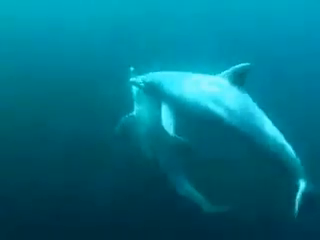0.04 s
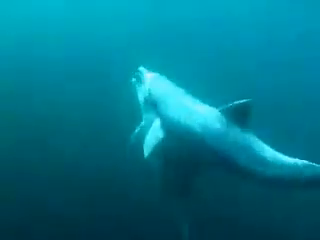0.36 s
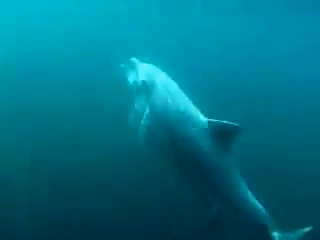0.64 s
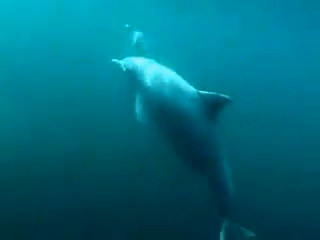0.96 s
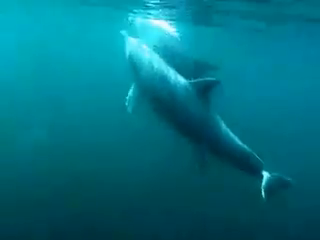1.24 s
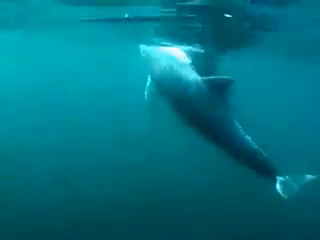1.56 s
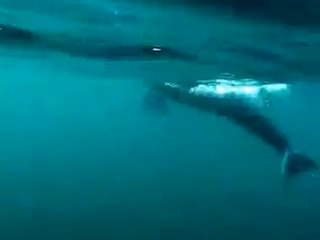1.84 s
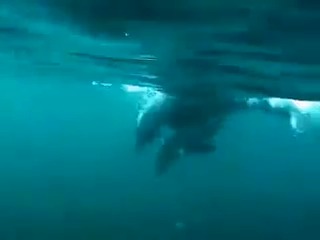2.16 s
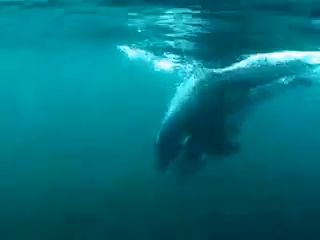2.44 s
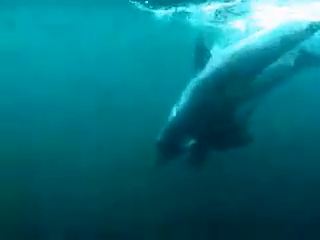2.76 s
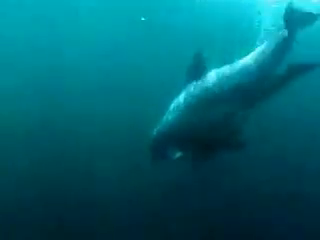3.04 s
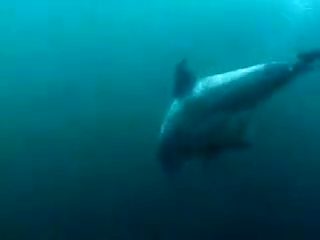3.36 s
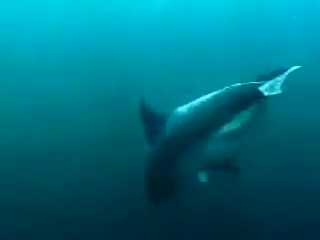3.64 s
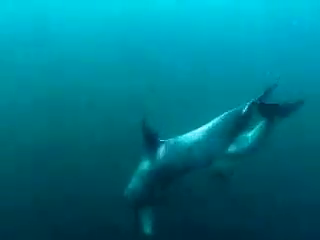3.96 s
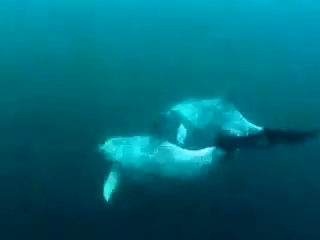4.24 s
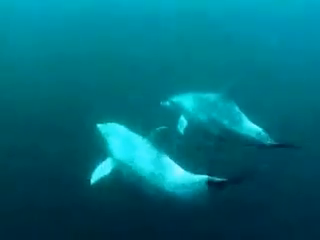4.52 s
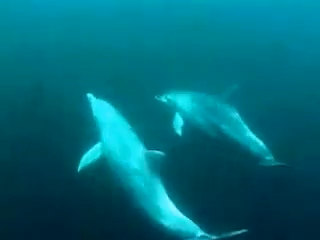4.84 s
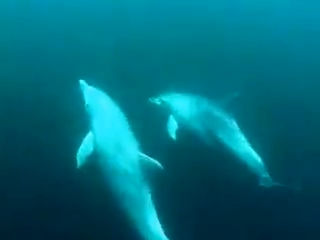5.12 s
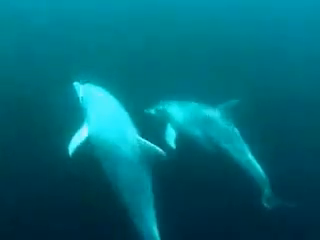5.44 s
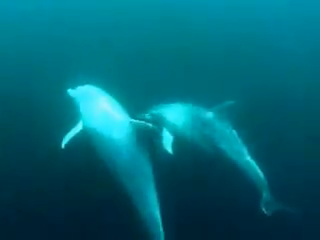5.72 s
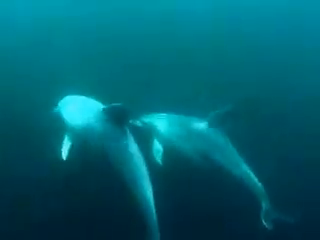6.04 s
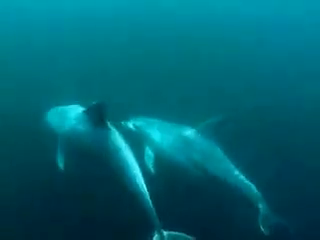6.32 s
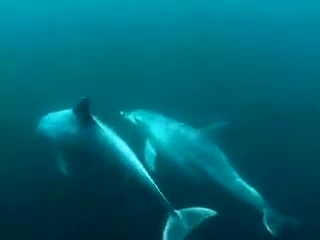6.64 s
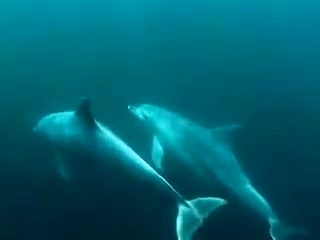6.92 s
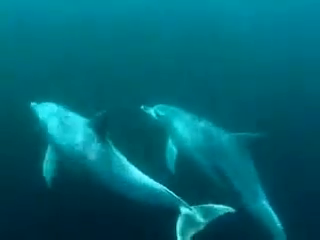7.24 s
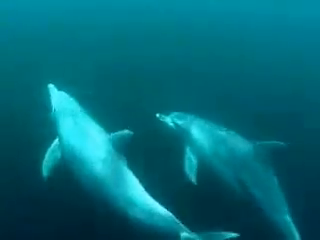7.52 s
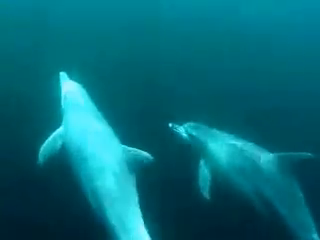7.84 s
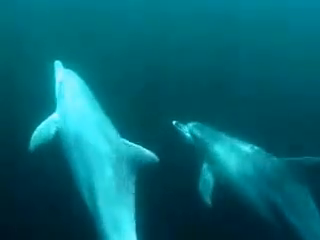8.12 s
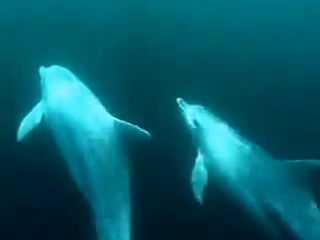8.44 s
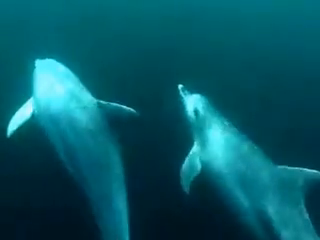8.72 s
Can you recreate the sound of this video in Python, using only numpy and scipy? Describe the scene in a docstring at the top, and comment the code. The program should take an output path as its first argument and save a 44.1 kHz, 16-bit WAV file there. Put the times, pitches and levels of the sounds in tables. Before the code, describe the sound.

Water rumbles steadily against a microphone held under the sea, dotted with plops of air and sharp little clicks. Two dolphins break the surface and dive, bringing a throaty gurgle and a loud wash of bubbles. High, rising whistles follow in a quick cluster while the bubbles fizz away. After a pause, a few more whistles sound over the rumble.

```python
"""Dolphins swim past a camera held under water. From the start, eddies rumble along the housing,
air pockets plop and sharp clicks set the housing ringing. From about 1.5 s two dolphins break the
surface and dive again, driving air under: it gurgles and leaves a cloud of ringing bubbles.
From 2.5 s they whistle in high upward sweeps, thickest just before 4 s. The cloud washes, fizzes
and dies away, and a few more whistles come over the rumble from 6 s to the end."""
import sys
import numpy as np
from scipy import signal
from scipy.fft import rfft, irfft, next_fast_len
from scipy.io import wavfile
from scipy.ndimage import uniform_filter1d, minimum_filter1d

SR = 44100
rng = np.random.default_rng(int(sys.argv[2]) if len(sys.argv) > 2 else 0)


def dump_mix(stems):
    """Bounce the given channels to the path in sys.argv[1] as a 16-bit WAV at rate SR."""
    frames = np.atleast_2d(stems).T  # one column per channel
    limited = np.clip(frames, -1, 1)  # hard clip at full scale
    pcm = np.round(limited * 32767).astype(np.int16)
    wavfile.write(sys.argv[1], SR, pcm)


N = 387198
TIME = np.arange(N) / SR


def from_db(db):
    """Decibels to gain."""
    return 10 ** (np.asarray(db) / 20)


def rms_one(x):
    """Scale to an rms of 1."""
    return x / np.sqrt(np.mean(x ** 2) + 1e-20)


def add(out, start_s, sound):
    """Mix a sound in at start_s."""
    at = max(int(round(start_s * SR)), 0)
    out[at:at + len(sound)] += sound[:max(N - at, 0)]


def coloured(x, colour):
    """Minimum-phase EQ through (freq_hz, level_db) points, 24 dB an octave down outside them; rms 1."""
    size = next_fast_len(N + SR // 2)
    hz, db = np.transpose(colour)
    grid_hz = np.maximum(np.arange(size // 2 + 1) * SR / size, 1)
    octaves_outside = np.abs(np.log2(grid_hz / np.clip(grid_hz, hz[0], hz[-1])))
    curve_db = np.interp(np.log(grid_hz), np.log(hz), db) - 24 * np.minimum(octaves_outside, 3)
    cepstrum = irfft(np.log(from_db(curve_db)), size)
    cepstrum[1:size // 2] *= 2
    cepstrum[size // 2 + 1:] = 0
    return rms_one(irfft(rfft(x, size) * np.exp(rfft(cepstrum)), size)[:N])


def drift(rate_hz):
    """Smooth random modulation with a spread of 1."""
    hop = 40
    pole = np.exp(-2 * np.pi * rate_hz * hop / SR)
    noise = rng.standard_normal(N // hop + 2002)
    slow = signal.lfilter([1], [1, -2 * pole, pole * pole], noise)[2000:]
    return np.interp(np.arange(N) / hop, np.arange(len(slow)), rms_one(slow))


def steadied(x, window_s):
    """Even out the slow swells of a noise, keeping its fine grain."""
    power = uniform_filter1d(x ** 2, max(int(window_s * SR), 2))
    return x / np.sqrt(np.abs(power) + 1e-9)


def ring(clicks, hz, t60_s):
    """Resonator: a unit click sets a sine of height 1 ringing."""
    decay, angle = from_db(-60 / (t60_s * SR)), 2 * np.pi * hz / SR
    return signal.lfilter([0, np.sin(angle)], [1, -2 * decay * np.cos(angle), decay ** 2], clicks + 1e-18)


def swell(start_s, hold_s, attack_s, fall_db_per_s):
    """Power envelope that is fully up at start_s, holds, then dies away."""
    attack = np.clip(1 + (TIME - start_s) / attack_s, 0, 1)
    return attack ** 2 * 10 ** (-fall_db_per_s * np.maximum(TIME - start_s - hold_s, 0) / 10)


def camera_whine(pitch_hz=5400, level_db=-81.5):
    """The camera's own faint, steady tone."""
    return from_db(level_db) * np.sqrt(2) * np.sin(2 * np.pi * pitch_hz * TIME)


# Soft upper-mid EQ of the sea's hiss, shared by the bubble wash: freq_hz, level_db
WASH_COLOUR = [(900, -17.5), (1450, -0.5), (2300, -1), (2900, -9), (3600, -13.5), (4200, -24),
               (5200, -40.5)]


def sea_hiss(level_db=-66):
    """The even hiss of the open water."""
    return from_db(level_db) * coloured(rng.standard_normal(N), WASH_COLOUR)


def turbulence(colour, lumpy_db, even_s):
    """Churning water: coloured noise with quick lumps in level, evened out over even_s."""
    noise = coloured(rng.standard_normal(N), colour)
    return steadied(noise * from_db(lumpy_db * drift(13.6)), even_s)


# Fader ride of the water streaming past the housing: time_s, level_db
FLOW_RIDE = [(0.0, -26), (0.41, -26.5), (0.49, -31), (0.88, -21), (0.95, -26), (1.25, -20), (1.71, -21.5),
             (1.76, -36), (1.81, -25), (1.96, -26), (3.57, -18.5), (3.79, -26.5), (4.6, -18.5),
             (5.04, -21.5), (5.67, -20.5), (6.09, -24), (6.14, -20), (7.9, -19.5), (8.07, -28),
             (8.29, -21.5), (8.36, -22), (8.78, -24)]
# Fader ride of the deep buffeting: time_s, level_db
BUFFET_RIDE = [(0.0, -32), (1.2, -18), (2.2, -27.5), (3.35, -19), (6.41, -16.5), (6.46, -21), (6.99, -14.5),
               (7.34, -20), (8.63, -14), (8.78, -19)]
# EQs of the sub-bass buffet, the bass rumble and the low-mid eddies: freq_hz, level_db
BUFFET_COLOUR = [(14, -7), (22, 5.5), (36, 0), (55, -5), (80, -21), (160, -53.5)]
RUMBLE_COLOUR = [(35, -22), (60, 3.5), (85, 2.5), (115, -3.5), (160, -18), (300, -50.5), (600, -73.5)]
EDDY_COLOUR = [(90, -13.5), (135, 7), (230, -2), (320, -7), (490, -14), (850, -27), (2000, -59)]


def flow(buffet_trim_db=2.24, rumble_trim_db=1.46, eddy_mean_db=-30.5, eddy_db_per_flow_db=1.64):
    """Large eddies buffet the housing, smaller ones rumble and rush; the smallest grow fastest with flow."""
    flow_db = np.interp(TIME, *np.transpose(FLOW_RIDE))
    buffet_db = np.interp(TIME, *np.transpose(BUFFET_RIDE))
    eddy_db = eddy_mean_db + eddy_db_per_flow_db * (flow_db - flow_db.mean())
    buffet = from_db(buffet_db + buffet_trim_db) * turbulence(BUFFET_COLOUR, lumpy_db=-1.5, even_s=0.12)
    rumble = from_db(flow_db + rumble_trim_db) * turbulence(RUMBLE_COLOUR, lumpy_db=2.5, even_s=0.12)
    eddies = from_db(eddy_db) * turbulence(EDDY_COLOUR, lumpy_db=2.5, even_s=0.29)
    return buffet + rumble + eddies


# Sharp clicks in the water: start_s, level_db, low_mode_boost_db
CLICKS = [(.822, -39.5, -3), (0.99, -43, 5), (1.4522, -36.5, 4), (1.6163, -28.5, 4), (1.6363, -38, 4),
          (1.653, -26, -4), (2.779, -34, -7), (2.806, -34, -13), (3.09, -39, 8), (3.442, -35.5, -8),
          (4.2798, -32.5, -2), (4.781, -37, -10), (6.568, -42, -1), (7.0691, -35, 5)]
# Housing resonances, three low then three high: pitch_hz, level_db, t60_s
HOUSING_MODES = [(1320, 4.5, 0.0058), (2260, -5, 0.015), (3180, -2, 0.0033), (5700, -8, 0.0071),
                 (6620, -2.5, 0.009), (7700, -18.5, 0.0078)]


def knocks(spread_db=0.74):
    """Sharp clicks set the housing ringing briefly, each mode with a strength of its own."""
    out = np.zeros(N)
    for k, (hz, mode_db, t60_s) in enumerate(HOUSING_MODES):
        clicks, is_low = np.zeros(N), k < 3
        for (start_s, db, boost_db), chance in zip(CLICKS, rng.standard_normal(len(CLICKS))):
            add(clicks, start_s, from_db([db + mode_db + is_low * boost_db + spread_db * chance]))
        out += (-1) ** k * ring(clicks, hz, t60_s)
    return out


def air_pocket(hz, t60_s, rise, onset_cycles):
    """A bubble pinches off and rings, its pitch creeping up as it nears the surface."""
    t = np.arange(int(1.5 * t60_s * SR)) / SR
    tone = np.sin(2 * np.pi * hz * t * (1 + rise * t / (2 * t60_s)))
    envelope = (1 - np.exp(-t * hz / onset_cycles)) * from_db(-60 * t / t60_s)
    return -tone * envelope / envelope.max()


# Single air pockets: start_s, pitch_hz, level_db, t60_s
PLOPS = [ (.336, 840, -29.5, 0.13), (.696, 1110, -29.5, 0.03), (.732, 2700, -42, .035),
         (.762, 840, -27.5, .047), (.891, 665, -30.5, .13), (.975, 1190, -32.5, 0.047),
         (.992, 581, -20.5, 0.074), (1.285, 990, -35, 0.04), (1.462, 371, -20, .13),
         (1.507, 967, -26, .047), (1.532, 2060, -26.5, 0.025), (1.598, 2430, -24.5, 0.016),
         (1.775, 780, -21.5, 0.059), (1.812, 230.6, -15.5, 0.23), (1.923, 1000, -21, .036),
         (1.937, 222, -12.5, 0.24), (1.94, 3310, -34.5, 0.033), (2.073, 202, -8, 0.11),
         (2.105, 780, -20, .015), (2.213, 224, -18, 0.15), (2.274, 2600, -28, 0.018), (2.308, 872, -19, .1),
         (2.44, 405, -25.5, 0.071), (2.525, 747, -16.5, 0.033), (2.605, 2990, -33.5, .047),
         (2.729, 670, -17.5, 0.022), (2.927, 2920, -25.5, 0.0099), (3.068, 910, -19.5, 0.081),
         (3.112, 2210, -24.5, 0.025), (3.212, 3130, -32, .024), (3.502, 2880, -33, 0.047),
         (3.825, 687, -25, .05), (4.42, 560, -27.5, .07), (4.471, 3700, -36, .01),
         (4.7, 3350, -39.5, 0.022), (5.629, 557, -24, .032), (5.8087, 2260, -33, 0.018)]
# Large pockets that split in two: start_s, pitch_hz, level_db, t60_s, smaller_half_offset_db
SPLITS = [(1.1113, 314, 4.5, 0.0067, -41), (1.7248, 420, -14.5, 0.013, 8.5), (1.8264, 557, -12.5, .026, -1),
          (2.671, 292, -14, 0.064, 4.5), (2.678, 603, -17.5, 0.083, -1), (3.231, 426, -17, 0.043, -2)]


def plops(trim_db=-0.5, split_pitch_ratio=1.75, satellite_db=-14, spread_octaves=0.45, satellites=6):
    """Each pocket of air plops; longer-ringing ones shed a louder splutter of satellite bubbles."""
    larger_halves = [row[:4] for row in SPLITS]
    smaller_halves = [(start_s, hz * split_pitch_ratio, db + offset_db, t60_s / 2)
                      for start_s, hz, db, t60_s, offset_db in SPLITS]
    out = np.zeros(N)
    for start_s, hz, db, t60_s in PLOPS + larger_halves + smaller_halves:
        add(out, start_s, from_db(db + trim_db) * air_pocket(hz, t60_s, rise=0.15, onset_cycles=0.93))
        splutter_gain = from_db(db + satellite_db) * min(t60_s / 0.046, 1) ** 2
        for lateness, height, strength in rng.random((satellites, 3)):
            lag_s = -0.2 * t60_s * np.log(1 - lateness)
            satellite_hz = hz * 2 ** (spread_octaves * (3 * height - 1))
            satellite = air_pocket(satellite_hz, t60_s / 2, rise=0.071, onset_cycles=0.22)
            add(out, start_s + lag_s, splutter_gain * (0.5 + strength) * satellite)
    return out


def bubbles(colour, low_hz, high_hz, per_s, ring_cycles, near_db, spread_db=4, pitch_count=24):
    """Near bubbles ring singly, in clumps; countless far ones merge into a smooth wash."""
    strengths = from_db(spread_db * np.minimum(rng.exponential(1, N), 4)) * rng.choice([-1, 1], N)
    births = strengths * (rng.random(N) < per_s * from_db(3 * drift(12)) / SR)
    pitch_index = rng.integers(0, pitch_count, N)
    near = sum(ring(births * (pitch_index == k), hz, ring_cycles / hz) * np.sqrt(hz)
               for k, hz in enumerate(np.geomspace(low_hz, high_hz, pitch_count)))
    far = coloured(rng.standard_normal(N), colour)
    return steadied(from_db(near_db) * coloured(near, colour) + far, window_s=0.14)


# Trails of air behind the two surfacing dolphins: start_s, hold_s, level_db
AIR_TRAILS = [(1.957, 0.083, -30.5), (2.303, 0.17, -25)]
# EQs of the throaty gurgle and the hollow plume: freq_hz, level_db
GURGLE_COLOUR = [(170, -23.5), (250, -1), (300, -12), (400, -14)]
PLUME_COLOUR = [(760, -14.5), (900, 1), (1030, -1), (1180, -9.5)]


def air_trails():
    """Large pockets gurgle behind each dolphin, and the plume of entrained air resonates as a whole."""
    power = sum(from_db(db) ** 2 * swell(start_s, hold_s, attack_s=0.14, fall_db_per_s=149)
                for start_s, hold_s, db in AIR_TRAILS)
    gurgle = bubbles(GURGLE_COLOUR, 207, 328, per_s=44, ring_cycles=58, near_db=6.5,
                     spread_db=3, pitch_count=8)
    plume = from_db(-8.5) * turbulence(PLUME_COLOUR, lumpy_db=0, even_s=0.67)
    return np.sqrt(power) * (gurgle + plume)


# Splashes and small waves that drive air under: start_s, hold_s, level_db, small_bubble_boost_db
SPLASHES = [(0.005, 0.065, -43.5, -3), (0.716, 0.33, -47, -1), (1.441, .05, -40, -4),
            (1.615, 0.34, -30, -2.5), (2.366, 0.16, -31.5, -4.5), (2.606, 0.4, -29.5, 0.5),
            (3.07, 0.18, -34, 6), (3.764, 0.078, -36.5, 4.5), (4.241, 0.08, -38.5, 3.5),
            (5.102, 0.22, -48, 0.5), (6.5, 0.13, -48, 6), (7.45, 0.32, -50.5, 6)]


def splash_ride(trim_db, smallness, linger_db, calm_db, attack_s=0.18):
    """Level in dB of one bubble size: each splash bursts, then leaves a thin cloud that slowly rises out."""
    power = from_db(calm_db) ** 2
    for start_s, hold_s, db, boost_db in SPLASHES:
        burst = swell(start_s, hold_s, attack_s, fall_db_per_s=39)
        cloud = swell(start_s, hold_s, attack_s, fall_db_per_s=4.5) * from_db(linger_db) ** 2
        power = power + from_db(db + trim_db + smallness * boost_db) ** 2 * (burst + cloud)
    return 10 * np.log10(power)


# EQs of the round mid bubbling and the bright fizz: freq_hz, level_db
BUBBLING_COLOUR = [(280, -11), (450, -6.5), (650, 1), (900, 0.5), (1100, -4), (1400, -11.5), (2200, -32.5)]
FIZZ_COLOUR = [(3600, -14.5), (4400, -10), (5300, -5), (6100, -1.5), (6800, -1.5), (7600, -8.5),
               (8600, -13), (10000, -23)]


def splash_cloud(churn_db=1.74):
    """Bubbles of three sizes, the smaller the higher. Single ones stand out while the splash is fresh."""
    bubbling_db = splash_ride(trim_db=0.13, smallness=0, linger_db=-13, calm_db=-58)
    wash_db = splash_ride(trim_db=-11.5, smallness=0.75, linger_db=-9, calm_db=-59.5)
    fizz_db = splash_ride(trim_db=-31, smallness=0.84, linger_db=-4, calm_db=-71)
    fresh_db = 0.33 * (wash_db - wash_db.max())
    bubbling = bubbles(BUBBLING_COLOUR, 380, 1500, per_s=320, ring_cycles=40, near_db=fresh_db + 7)
    wash = bubbles(WASH_COLOUR, 1200, 4200, per_s=650, ring_cycles=61, near_db=fresh_db + 6)
    fizz = bubbles(FIZZ_COLOUR, 4400, 9000, per_s=450, ring_cycles=55, near_db=fresh_db + 3.5)
    cloud = from_db(bubbling_db) * bubbling + from_db(wash_db) * wash + from_db(fizz_db) * fizz
    # the water churns in bursts that shake loose bubbles of every size at once
    return from_db(churn_db * drift(11)) * cloud


# Slapback of a whistle off the surface: delay_s, level_db
SURFACE_ECHOES = [(.0043, -16), (0.0122, -13.5), (0.025, -33.5)]


def surface_reflections(direct, scatter_db=-19, scatter_t60_s=0.22):
    """The surface returns echoes with flipped polarity; its waves scatter a short tail."""
    mirrored = -sum(from_db(db) * np.interp(TIME - delay_s, TIME, direct) for delay_s, db in SURFACE_ECHOES)
    tail = rng.standard_normal(SR // 2) * from_db(-60 * TIME[:SR // 2] / scatter_t60_s)
    scattered = signal.fftconvolve(direct, tail / np.linalg.norm(tail))[:N]
    return mirrored + from_db(scatter_db) * scattered


# How the housing passes a whistle: pitch_hz, gain_db
HOUSING_RESPONSE = [(4300, -16.5), (5000, -13.5), (5600, -6.5), (6200, 3.5), (6800, -4), (7500, -5.5),
                    (8300, -12), (9400, -24)]


def whistle_contour(t, shape, release_s=0.027):
    """Pitch and level of a whistle: it swoops to its base note, bends into a climb, swells and fades."""
    base_hz, swoop_hz, swoop_s, upturn_s, climb_hz_per_s, bend_s = shape[:6]
    crest_s, level_db, swell_db, fade_db = shape[6:]
    swoop = swoop_hz * np.exp(-t / swoop_s)
    climb = climb_hz_per_s * bend_s * np.logaddexp(0, (t - upturn_s) / bend_s)
    hz = base_hz + swoop + climb
    effort_db = np.interp(t, [0, crest_s, crest_s + release_s], [-swell_db, 0, -fade_db])
    housing_db = np.interp(hz, *np.transpose(HOUSING_RESPONSE))
    return hz, level_db + effort_db + housing_db


# Whistle cues, with upturn and crest timed from each start: start_s, length_s, base_hz, swoop_hz,
# swoop_s, upturn_s, climb_hz_per_s, bend_s, crest_s, level_db, swell_db, fade_db
WHISTLES = [ (2.55, .24, 4052, 1576, .03, .09, 26600, .026, .17, -39, 0, 4),
            (3.33, .265, 5045, 105, .057, .172, 19700, .036, .2, -54, 1, 2),
            (3.5, .39, 4459, -139, .065, .196, 25060, .061, .27, -39, 23, 6),
            (3.68, .365, 5374, 2481, .073, .218, 26240, .043, .3, -40, 13, 0),
            (3.79, .22, 4741, -442, .013, .039, 24700, .005, .085, -39, 8, 13),
            (6.22, .2, 4774, -179, .034, .101, 19260, .014, .14, -41, 8, 13),
            (6.91, .15, 5032, 268, .009, .027, 31000, .005, .005, -57, 0, 8),
            (7.52, .44, 5080, 680, .016, .28, 24500, .036, .295, -46, 6, 18),
            (8.58, .22, 4660, -400, .035, .2, 0, .01, .085, -39, 22, 0)]


def dolphins(tremble=0.003, wander=0.005, flutter_db=1.6):
    """Pure gliding tones that waver slightly, mirrored and scattered by the waves overhead."""
    direct = np.zeros(N)
    waver_db = flutter_db * drift(30)
    detune = tremble * drift(60) + wander * drift(9)
    for start_s, length_s, *shape in WHISTLES:
        at = np.arange(int(start_s * SR), min(int((start_s + length_s) * SR), N))
        hz, db = whistle_contour(at / SR - start_s, shape)
        phase = 2 * np.pi * np.cumsum(hz * (1 + detune[at])) / SR
        envelope = from_db(db + waver_db[at]) * signal.windows.tukey(len(at), 0.06)
        add(direct, start_s, envelope * np.sin(phase))
    return direct + surface_reflections(direct)


def scene():
    """Water, bubbles, knocks and whistles meet at one microphone."""
    water = flow() + air_trails() + splash_cloud() + sea_hiss() + plops()
    return (camera_whine() + water + knocks() + dolphins())[None]


def record(dry, ceiling=0.62, limiter_s=0.003, cutoff_hz=9600):
    """A fast limiter holds the peaks down; the top is cut steeply."""
    window = int(limiter_s * SR)
    needed_gain = ceiling / np.maximum(np.abs(dry), ceiling)
    gain = uniform_filter1d(minimum_filter1d(needed_gain, window), window)
    low_pass = signal.ellip(10, 0.1, 80, cutoff_hz, fs=SR, output="sos")
    return signal.sosfilt(low_pass, dry * gain)


dry = scene()
out = record(dry)
dump_mix(out)
```